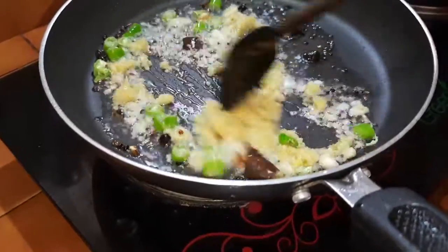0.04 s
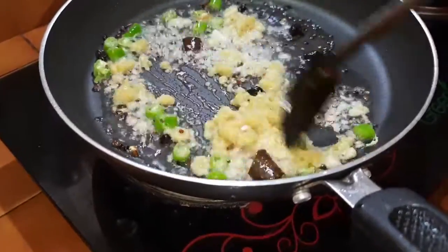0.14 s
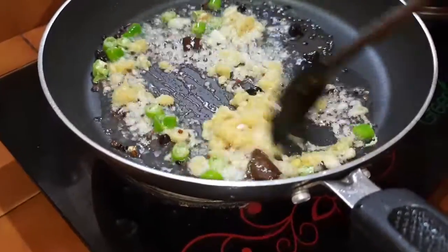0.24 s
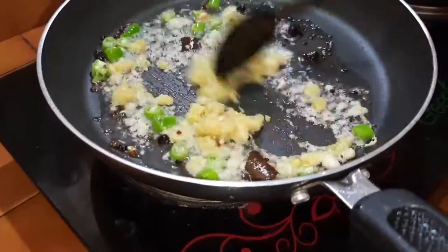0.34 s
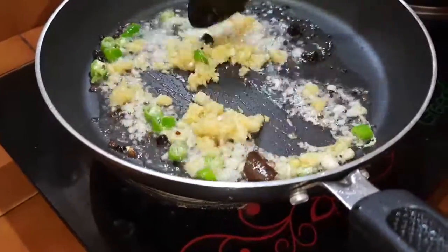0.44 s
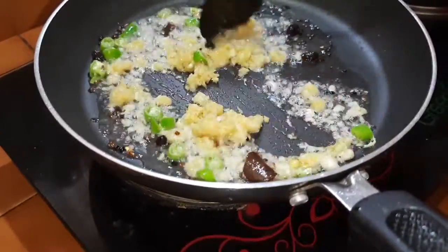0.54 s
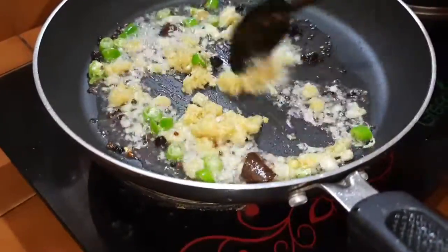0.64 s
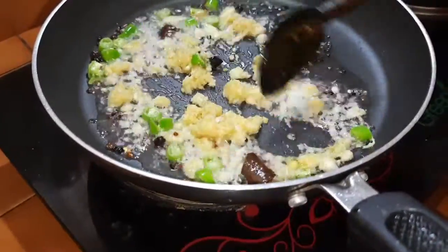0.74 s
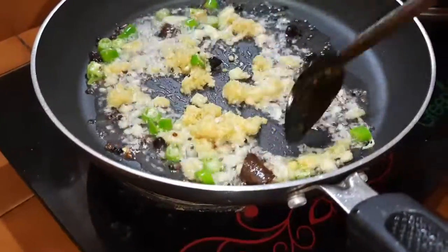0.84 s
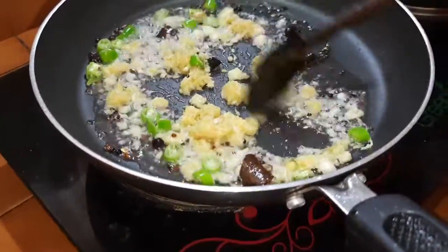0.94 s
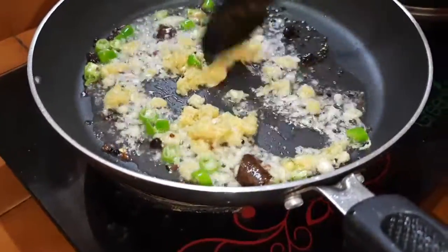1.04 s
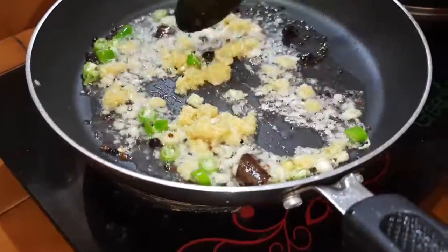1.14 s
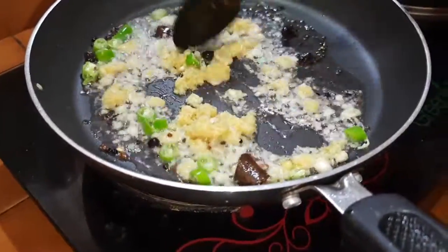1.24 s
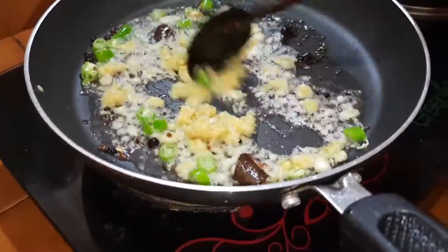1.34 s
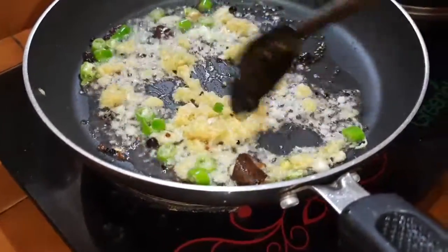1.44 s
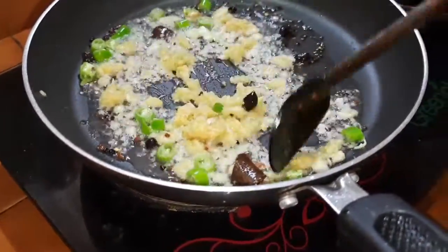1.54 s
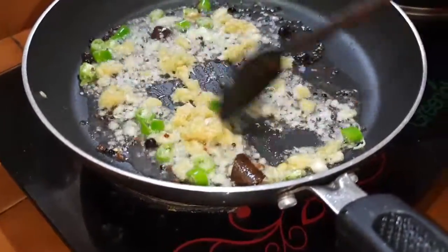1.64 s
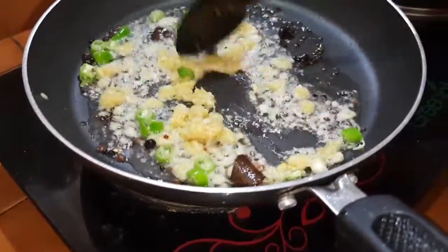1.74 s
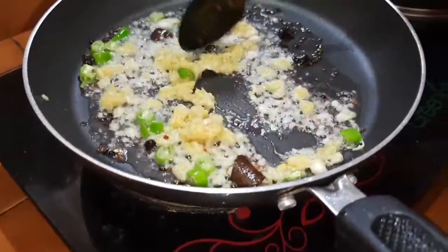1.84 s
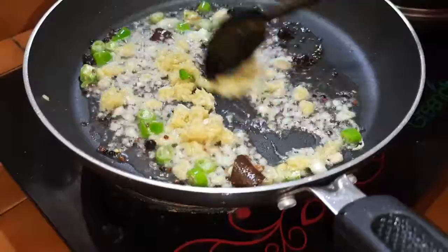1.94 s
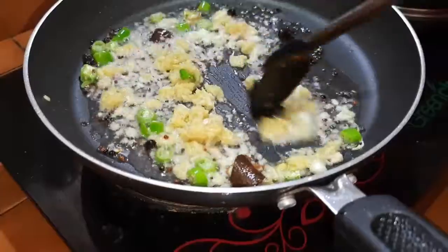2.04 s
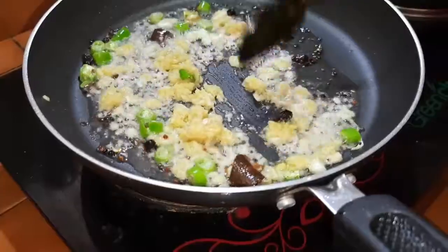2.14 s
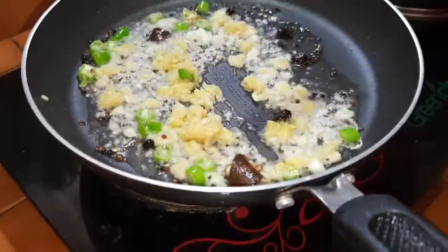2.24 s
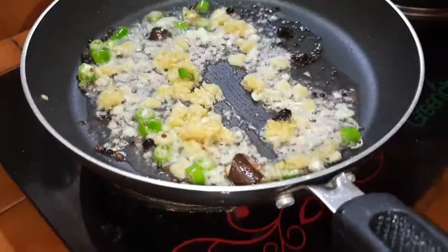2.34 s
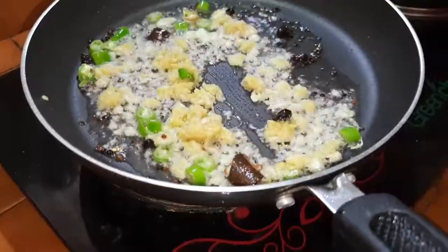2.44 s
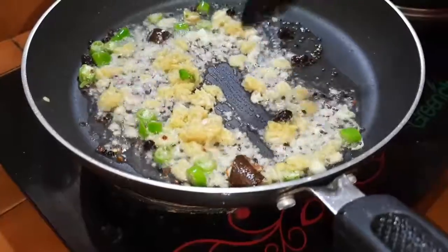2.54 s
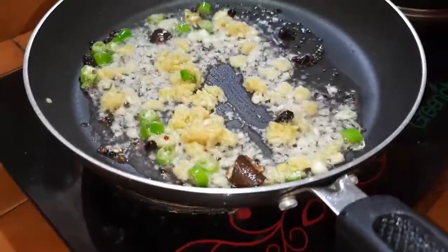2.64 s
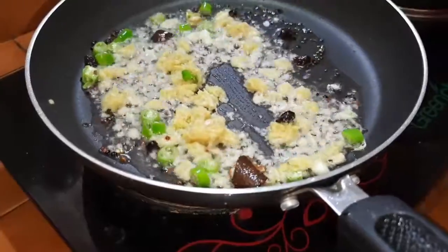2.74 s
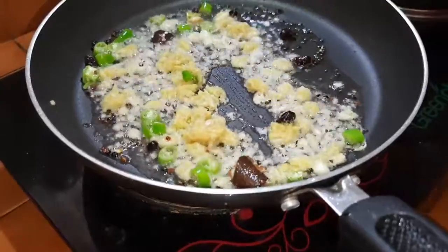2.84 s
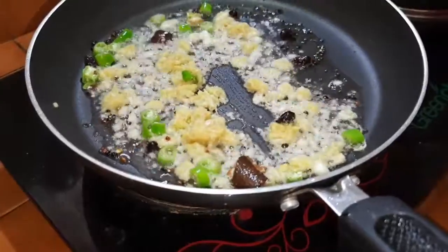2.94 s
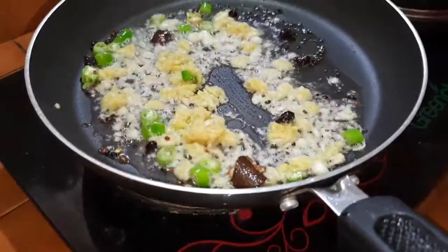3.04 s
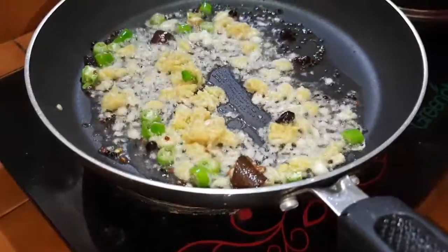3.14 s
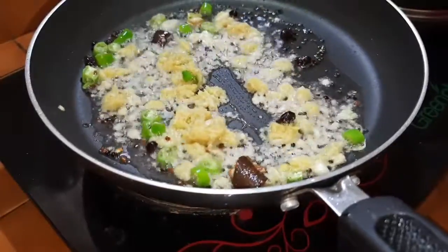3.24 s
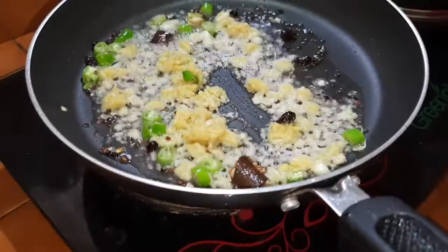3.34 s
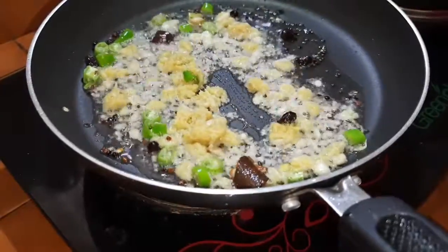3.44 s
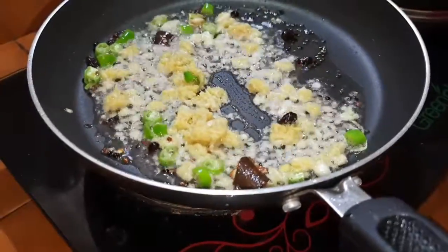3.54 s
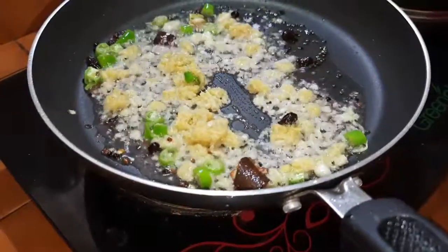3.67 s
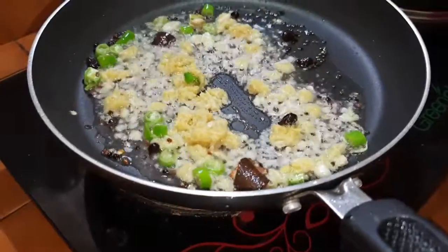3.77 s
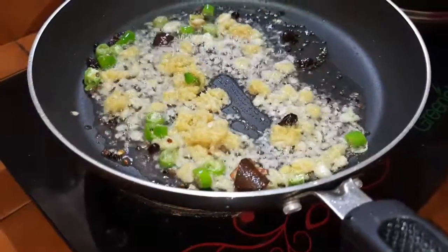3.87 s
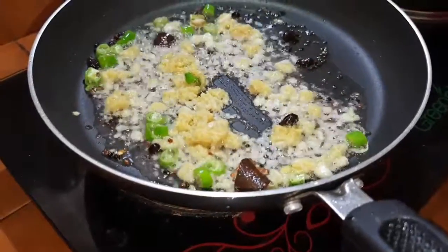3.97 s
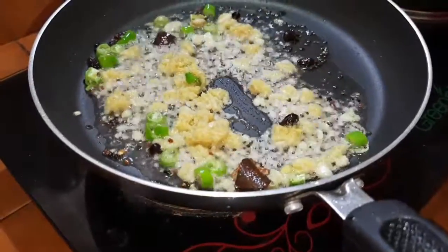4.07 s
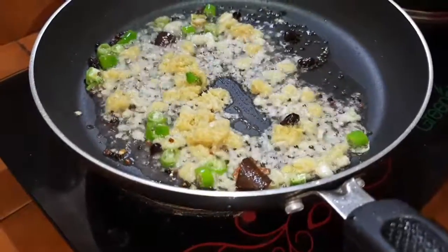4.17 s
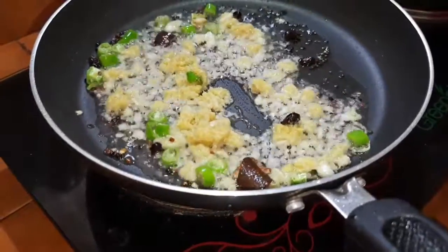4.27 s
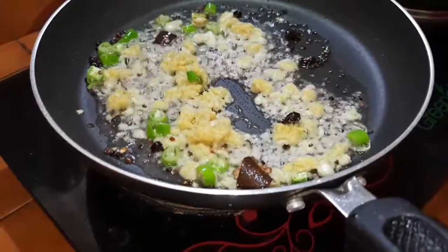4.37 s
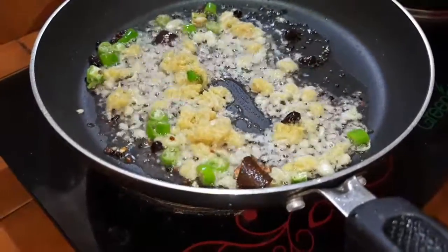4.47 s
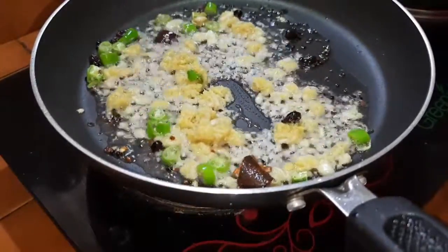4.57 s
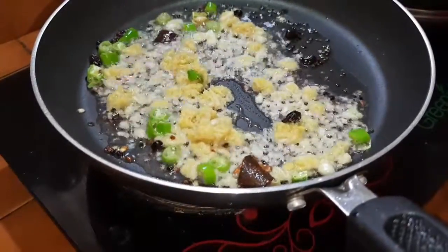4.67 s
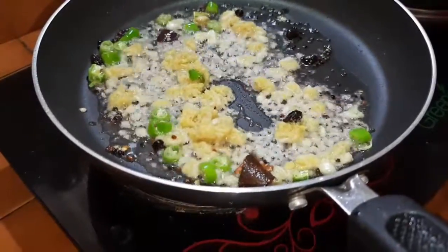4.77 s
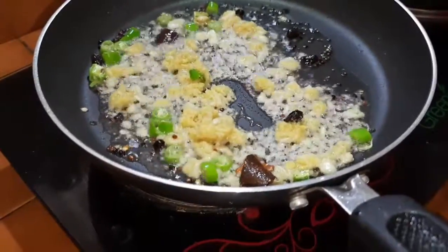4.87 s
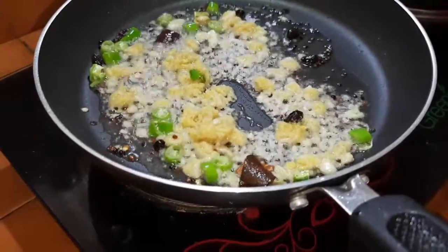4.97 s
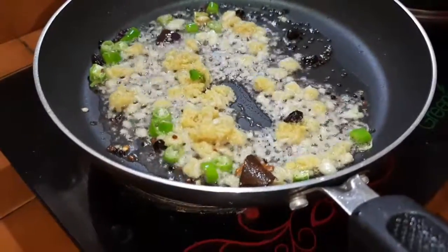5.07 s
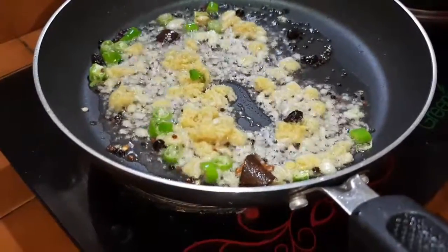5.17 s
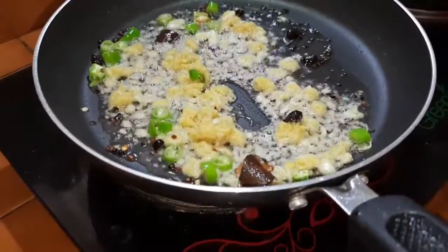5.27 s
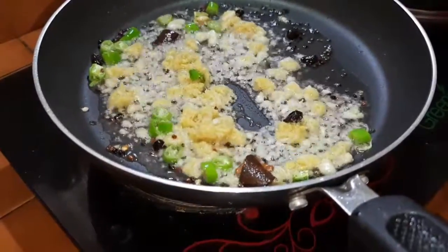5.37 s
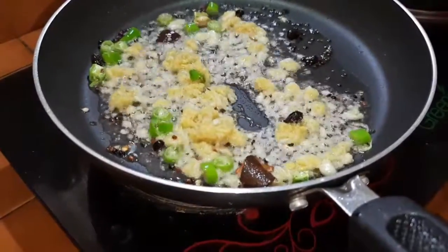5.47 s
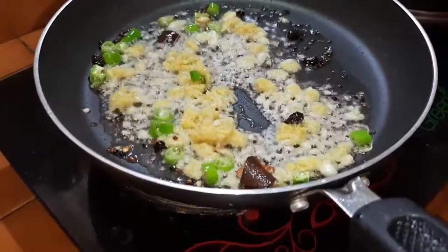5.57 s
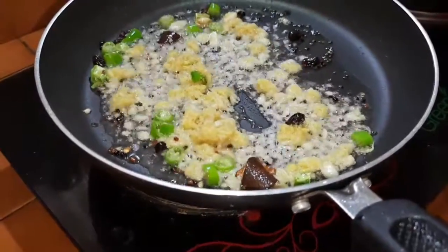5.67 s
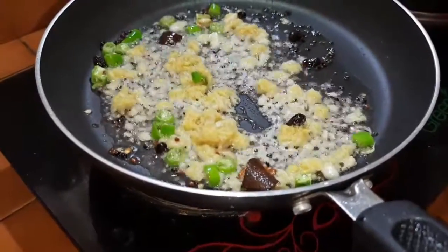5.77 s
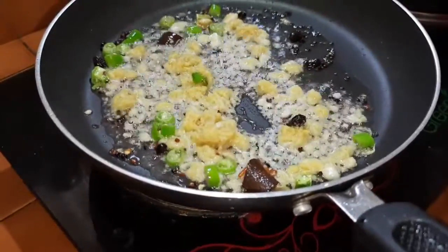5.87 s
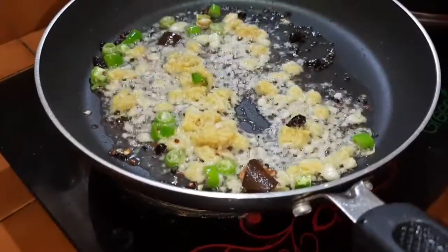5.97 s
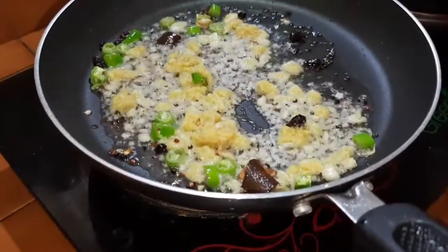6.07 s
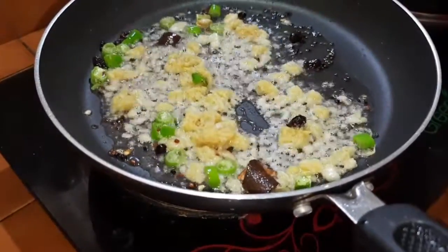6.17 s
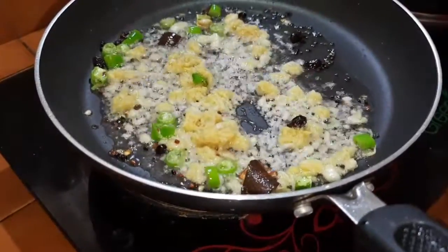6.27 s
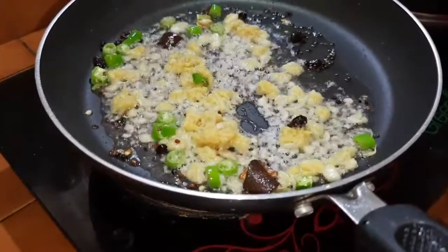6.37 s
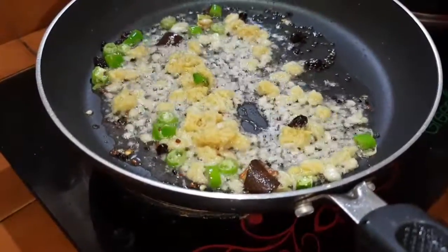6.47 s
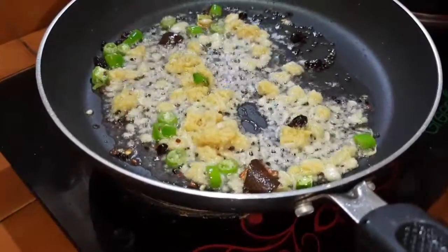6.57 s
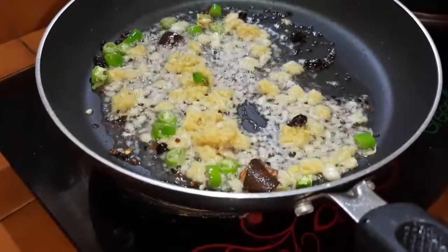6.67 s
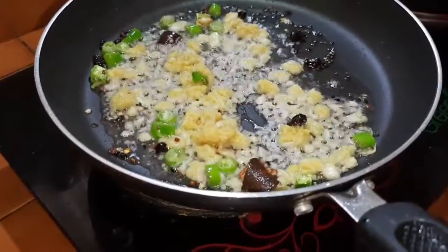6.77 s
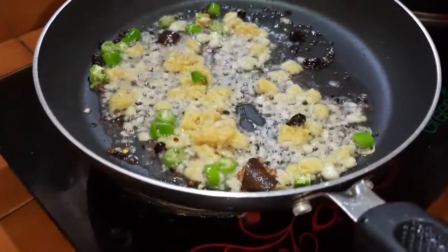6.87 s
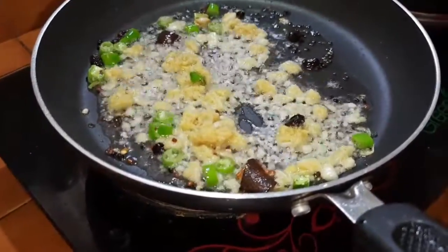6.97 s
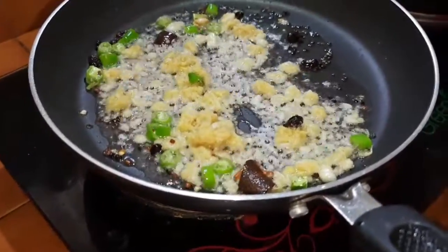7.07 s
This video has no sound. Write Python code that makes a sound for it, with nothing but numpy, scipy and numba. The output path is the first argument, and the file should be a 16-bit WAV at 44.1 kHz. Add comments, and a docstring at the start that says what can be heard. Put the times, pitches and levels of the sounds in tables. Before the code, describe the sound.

A close stereo phone pickup in a small kitchen: ginger, chillies and spices fry in hot oil, making a continuous dense, bright sizzle of countless tiny bursting bubbles, flickering unevenly. Sharp snaps and softer plops stand out, including a strong snap near 0.4 s and others around 1.0, 1.4 and 1.75 s. A spatula taps the pan with short, dry, muted metallic clacks and gritty scrapes at about 0.97-1.05, 1.36, 1.67 and 1.95-2.05 s. Only frying follows until 3.27 s, when the spatula is laid beside the pan: a quick cluster of knocks, rattling rubs and low hob thuds until 3.4 s, then a softer settling bump near 3.52 s and faint dull rubbing to about 3.8 s. The sizzle gradually calms, with sparser pops, including a bright snap at 4.5 s, continuing to the end around 7.1 s over a very faint rumble.

```python
"""In a kitchen, ginger, chillies and spices fry in hot oil close to a phone with two microphone ports.
Thousands of steam bubbles burst each second, as short swelling sines over filtered noise; a few pop loudly.
A spatula taps and scrapes the pan: filtered pushes and gritty noise excite its damped modes and rock it on the hob.
Later the spatula is laid down nearby with knocks, rubbing and thuds.
The frying calms slowly over a faint rumble of coloured noise."""
import sys
import numpy as np
from scipy import signal
from scipy.fft import rfft, irfft
from scipy.io import wavfile
from scipy.ndimage import uniform_filter1d
from numba import njit

SR = 44100
rng = np.random.default_rng(int(sys.argv[2]) if len(sys.argv) > 2 else 0)


def store_wav(level_fs):
    """Save 16-bit WAV to argv[1]."""
    pcm = np.round(np.clip(np.atleast_2d(level_fs), -1, 1) * 32767)
    wavfile.write(sys.argv[1], SR, pcm.T.astype(np.int16))


N = 313551  # length [samples]


def undb(db):
    """Decibel law: amplitude ratio of a level."""
    return 10 ** (np.asarray(db) / 20)


def unit(x):
    """Normalisation: scale to an rms of 1 over all channels."""
    return x / np.sqrt(np.mean(x ** 2))


def curves(table):
    """Linear interpolation: columns of a (time [s], ..) table, one value a sample."""
    s, *columns = np.transpose(table)
    return [np.interp(np.arange(N) / SR, s, c) for c in columns]


def butter(x, order, hz, kind="low"):
    """Butterworth filtering: a maximally flat pass band."""
    return signal.sosfilt(signal.butter(order, hz, kind, fs=SR, output="sos"), x)


def colour(x, table):
    """Linear filtering: multiply the spectra by (frequency [Hz], left [dB], right [dB]) curves."""
    hz, *sides = np.transpose(table)
    log_hz = np.log(np.arange(1, N // 2 + 2) * SR / N)
    gains = np.array([undb(np.interp(log_hz, np.log(hz), db)) for db in sides])
    return irfft(rfft(x) * gains, N)


def flatten(x):
    """Spectral whitening: even out the long-term spectrum."""
    spectrum = rfft(x)
    power = uniform_filter1d(np.abs(spectrum) ** 2, size=1500)
    return unit(irfft(spectrum / np.sqrt(power + 1e-9), N))


def walk(rate):
    """Slow random modulation: values held 1 / rate s, then smoothed twice; spread near 0.7."""
    k = int(SR / rate)
    held = np.repeat(rng.standard_normal(N // k + 1), k)
    return 0.96 * uniform_filter1d(uniform_filter1d(held, k), k)[:N]


def partly_shared_noise():
    """Spatial coherence: noise common to both ports, and noise of each port alone."""
    return rng.standard_normal(N), rng.standard_normal((2, N))


def ring(x, modes):
    """Modal superposition: a push sets every (frequency [Hz], level [dB], T60 [s]) mode ringing."""
    out = 0
    for hz, db, t60 in modes:
        pole = np.exp(2j * np.pi * hz / SR - np.log(1000) / (t60 * SR))
        out = out + undb(db) * signal.lfilter([1], [1, -pole], x).imag
    return out


@njit
def band(x, hz, share):
    """Resonance: a state-variable band-pass with a moving centre; width is a share of the centre."""
    y, b, l = np.empty(len(x)), 0., 0.
    for i in range(len(x)):
        g = np.tan(np.pi * hz[i] / SR)
        v = (b + g * (x[i] - l)) / (1 + g * (g + share))
        b, l, y[i] = 2 * v - b, l + 2 * g * v, share * v
    return y


def fixed_band(x, hz, share):
    """Resonance at a constant frequency."""
    return band(x, np.full(N, 1. * hz), share)


def impulse(s, db):
    """Ideal impact: all of the push falls in one sample."""
    return undb(db) * (np.arange(N) == int(s * SR))


def grit(rough_db):
    """Stick-slip friction: dense uneven slips of an edge dragged over a surface."""
    return unit(rng.standard_normal(N) * undb(rough_db * walk(250)))


def ports(x, left_lag_s):
    """Arrival time difference: one sound at both ports, late at the farther one."""
    k = int(round(left_lag_s * SR))
    return np.array([np.roll(x, max(k, 0)), np.roll(x, max(-k, 0))])


# treble resonances of the two microphone ports: (frequency [Hz], left [dB], right [dB])
PORT_RESONANCES = [(6800, 0, 1.34), (7890, -9.5, 3), (7710, 1.5, -17), (8700, 7, 3), (10260, 4, -1.5),
                   (11200, 2, -6.5), (12200, 6, 2.5), (13600, 1.5, -2.5), (14800, -0.5, 1),
                   (16900, -4, -5.5)]


def port_resonance(x):
    """Cavity resonance: each port colours the treble in its own way."""
    return colour(x, PORT_RESONANCES)


ROOM_T60_S, ROOM_ALIKE_HZ = 0.4, 350  # reverberation time; below this the tail is alike at both ports


def room(x, wet_db):
    """Diffuse reverberation: the walls return an exponentially decaying tail, coherent only in the bass."""
    t = np.arange(int(.4 * SR)) / SR
    shared, *own = rng.standard_normal((3, len(t)))
    tail = own + butter(shared - np.array(own), 1, ROOM_ALIKE_HZ)
    tail = tail * np.exp(-np.log(1000) * t / ROOM_T60_S) * (t > .003)
    tail /= np.sqrt(np.sum(tail ** 2, axis=1, keepdims=True))
    echoes = signal.fftconvolve(np.broadcast_to(x, (2, N)), tail, axes=1)[:, :N]
    return x + undb(wet_db) * echoes


# spectrum of the kitchen rumble: (frequency [Hz], left [dB], right [dB])
RUMBLE_SPECTRUM = [(25, -19, -34), (60, 1, -3), (93, -0.5, -18), (112, 3.5, -8), (137, -2, -9.5),
                   (222, -5, -11), (328, -1.5, -4), (614, -3.5, -10), (1100, -3, 2.5), (2500, -50, -46)]
KITCHEN_DB = -51


def kitchen():
    """Partially coherent background noise: a wavering low rumble, partly shared by both ports."""
    shared, own = partly_shared_noise()
    return undb(KITCHEN_DB + 0.25 * walk(5.3)) * unit(colour(0.6 * shared + own, RUMBLE_SPECTRUM))


# low modes of the hob top: (frequency [Hz], level [dB], T60 [s])
HOB_RESONANCES = [(61.5, -14, .12), (98, -23, 0.14), (145, -2, 0.1), (190, -9.5, 0.14), (240, 3.5, 0.058),
                  (332, -1, 0.063)]


def hob(x):
    """Plate radiation: the hob top booms at a few low modes and radiates little below them."""
    return butter(ring(x, HOB_RESONANCES), 2, 50, "high")


# modes of the spatula at rest: (frequency [Hz], level [dB], T60 [s])
SPATULA_RESONANCES = [(414, 0, 0.039), (660, 2, 0.019), (950, -7, 0.047), (1177, -3, 0.12),
                      (1282, 1, 0.096), (1540, 7, 0.023), (1900, -7, 0.03), (2150, -4, 0.079),
                      (2250, 2, 0.057), (2380, 2, .025), (2524, 10, 0.026), (2750, 7, .018)]


def spatula(x):
    """Modal vibration: the spatula rings where it is laid down."""
    return ring(x, SPATULA_RESONANCES)


def padded_contact(s, db, hz, passes):
    """Contact compliance: a padded blow pushes only the modes near its pitch."""
    push = impulse(s, db)
    for _ in range(passes):
        push = fixed_band(push, hz, 0.42)
    return push


# weight of the spatula thudding on the hob: (time [s], push strength [dB], pitch [Hz])
HOB_THUDS = [(3.274, -33, 240), (3.292, -36, 240), (3.312, -30, 235), (3.345, -31, 230), (3.365, -39, 139),
             (3.389, -42, 70), (3.455, -41, 205), (3.515, -40, 230), (3.535, -39.5, 145)]


def thuds():
    """Structure-borne sound: the weight of the spatula drives the hob top."""
    return hob(sum(padded_contact(s, db, hz, 1) for s, db, hz in HOB_THUDS))


# spatula landing and bouncing: (time [s], push strength [dB], pitch [Hz])
LANDING_KNOCKS = [(3.2957, -17, 900), (3.2995, -23, 950), (3.3117, -20, 1410), (3.315, -29, 2250),
                  (3.317, -28, 660), (3.334, -24, 2500), (3.338, -19, 1450), (3.352, -28, 2400),
                  (3.3573, -32, 2550), (3.362, -33, 2400), (3.377, -28, 1390), (3.52, -27, 1280),
                  (3.548, -29, 1200)]
REST_LAG_S = .00027  # blows beside the pan reach the left port last


def knocks():
    """Impact excitation: each bounce gives its own push and sets the spatula ringing."""
    push = sum(padded_contact(s, db, hz, 2) for s, db, hz in LANDING_KNOCKS)
    return ports(spatula(push) + 6.5 * push, REST_LAG_S)


# spatula sliding to rest: (time [s], rubbing strength [dB], brightness [Hz])
SLIDE = [(3.262, -66, 700), (3.276, -58, 700), (3.3, -33, 900), (3.308, -30, 1200), (3.316, -30, 1800),
         (3.329, -28, 2000), (3.338, -27, 2300), (3.355, -26.5, 2290), (3.376, -31, 1900),
         (3.396, -35, 1700), (3.438, -53, 1500), (3.468, -42, 1300), (3.505, -46, 1250),
         (3.526, -41.5, 1250), (3.56, -41.5, 1200), (3.6, -52, 1200), (3.66, -59, 1100), (3.69, -47, 420),
         (3.72, -47.5, 404), (3.82, -51, 403)]


def sliding():
    """Friction excitation: slips rattle the spatula; harder rubbing adds a bright rasp."""
    rub_db, bright_hz = curves(SLIDE)
    # the whole length rattles: each port hears its own slips
    rub = np.array([band(band(grit(2.8), bright_hz, 1.0), bright_hz, 2.5) for _ in range(2)])
    body = unit(spatula(rub)) + 0.5 * unit(rub)
    rasp = unit(np.array([fixed_band(grit(3.5), 5000, 0.75) for _ in range(2)]))
    rasp = rasp * undb(4.0 + 0.4 * (rub_db - rub_db.max()))
    t = np.arange(N) / SR
    moving = (t > SLIDE[0][0]) & (t < SLIDE[-1][0])
    return moving * undb(rub_db) * (body + rasp)


# spatula on the pan, and at 1.169 s a low puff of air from a pop:
# (time [s], push strength [dB], dullest [Hz], brightest [Hz],
#   drag length [s], drag strength [dB], rocking strength [dB], rocking pitch [Hz])
PAN_PUSHES = [(0.9715, -15, 760, 1900, 0.012, -49, -72, 240),
              (.9865, -23, 900, 1700, 0.027, -46.5, -54.5, 240),
              (1.0311, -14.5, 1010, 6500, 0.0025, -40, -61, 190),
              (1.045, -34, 1800, 2800, 0.014, -43, -57, 80), (1.169, -32.5, 70, 2000, .003, -61, -68, 70),
              (1.3605, -18, 563, 1900, 0.0067, -53, -71, 145),
              (1.373, -32, 500, 1100, 0.0083, -67, -80, 145), (1.395, -27, 503, 900, 0.041, -57, -82, 145),
              (1.6695, -21.5, 1000, 3200, 0.024, -45, -59, 143),
              (1.686, -26, 1300, 3200, .018, -51, -75, 143), (1.695, -26, 596, 1500, 0.0065, -52, -78, 143),
              (1.704, -29, 700, 1500, 0.0066, -49, -80, 143), (1.951, -13, 590, 1150, .012, -48, -58, 145),
              (1.965, -27, 480, 900, 0.01, -65, -74, 144), (1.987, -24, 520, 970, 0.026, -52, -81, 145),
              (2.045, -35, 540, 745, 0.033, -61, -87, 145)]
# modes of the pan: (frequency [Hz], level [dB], T60 [s])
PAN_RESONANCES = [(520, -9, 0.02), (638, -5.5, 0.052), (700, -12, 0.035), (776, -8, 0.029),
                  (860, -7.5, 0.017), (1014, -5.5, 0.041), (1200, -5, 0.012), (1460, -5, 0.023),
                  (1880, -9, 0.013), (2040, -6, 0.029), (2340, -8, 0.021), (2610, -3, 0.03),
                  (2970, -7, 0.039), (3900, 0.5, 0.012), (4700, 6, .011), (5400, 8, .011)]
TAP_LEAD_S = .00008  # pushes on the pan reach the left port first


def taps_and_puff():
    """Impact and friction: a push and gritty noise ring the pan, and low hob modes answer late."""
    t, push, rock, slips = np.arange(N) / SR, np.zeros(N), np.zeros(N), grit(3.0)
    for s, push_db, dull_hz, bright_hz, drag_s, drag_db, rock_db, rock_hz in PAN_PUSHES:
        since = np.maximum(t - s, 0)
        drag = (since > 0) * undb(drag_db) * slips * np.exp(-(since / drag_s) ** 3)
        # for a tap, the place of the blow sets its colour
        push += butter(impulse(s, push_db) + drag, 2, [dull_hz, bright_hz], "band")
        # the rocking of the pan builds up late
        rocking = undb(rock_db) * slips * since / 0.015 * np.exp(-since / 0.016)
        rock += fixed_band(rocking, rock_hz, 0.56)
    pan = butter(ring(push, PAN_RESONANCES), 2, 400, "high") + 8.1 * push
    return ports(pan, -TAP_LEAD_S) + hob(rock)


@njit
def bursts(start, hz, cycles, size, n):
    """Damped bubble oscillation: each swells for a third of its cycles, rings and dies."""
    out = np.zeros(n)
    for k in range(len(hz)):
        fade = 3 * hz[k] / SR / cycles[k]
        p = np.exp(2j * np.pi * hz[k] / SR - fade)
        z = size[k] * np.e * fade + 0j
        for i in range(min(n - start[k], int(8 / fade) + 2)):
            out[start[k] + i] += i * z.imag
            z *= p
    return out


def both_ports(s, lag_s, hz, cycles, size, pan_db):
    """Time and level differences: a burst reaches the ports at its own lag and balance."""
    channels = []
    for side in (1, -1):  # left, right
        start = np.clip(((s + side * lag_s / 2) * SR).astype(np.int64), 0, N - 1)
        channels.append(bursts(start, hz, cycles, size * undb(side * pan_db / 2), N))
    return np.array(channels)


# large bubbles plop long, small ones snap short and farther to the left:
# (pitch [Hz], length [cycles], left minus right [dB], full spread of the lag between ports [s])
BUBBLE_LAW = [(5600, 10, 2, 0.00029), (8400, 3, 4, .0003)]
SNAP_DB, SNAP_PITCH, SNAP_CYCLES = -12, 0.49, 1.27  # dull opening snap: relative level, share of pitch, length


def pops(s, level_db, hz):
    """Bubble scaling: pitch sets the length and side of a burst; a dull snap opens it."""
    law_hz, *laws = np.transpose(BUBBLE_LAW)
    cycles, pan_db, spread_s = [np.interp(hz, law_hz, law) for law in laws]
    lag_s = spread_s * (rng.random(len(s)) - .5)
    ringing = both_ports(s + 0.00044, lag_s, hz, cycles, undb(level_db), pan_db)
    snap_cycles = np.full(len(s), SNAP_CYCLES)
    snap = both_ports(s + 0.0004, lag_s, SNAP_PITCH * hz, snap_cycles, undb(level_db + SNAP_DB), pan_db)
    return port_resonance(ringing + snap)


# single bubbles bursting at set times, loud snaps and softer plops:
# (time [s], level before the port resonances [dB], pitch [Hz])
SINGLE_POPS = [(0.017, -9, 8720), (0.115, -6, 8650), (0.2905, -9, 9710), (0.313, -12, 9150),
               (0.432, 3, 12200), (0.4798, -17, 6500), (0.5604, -10, 12500), (0.5732, -10, 9300),
               (0.6494, -9, 9000), (0.6629, -13, 9710), (1.0307, -2, 9400), (1.136, -11, 9000),
               (1.1445, -17, 4000), (1.166, -24, 4100), (1.1675, -6, 12200), (1.224, -10, 9070),
               (1.242, -12, 5600), (1.3172, -7, 8500), (1.3828, -1, 12700), (1.619, -19.5, 3840),
               (1.7436, -13, 5600), (1.7436, -8, 12200), (1.744, 0, 9400), (1.806, -8, 8600),
               (1.806, -18, 6200), (1.964, -7, 9610), (2.0862, -9, 12600), (2.1424, -17, 5240),
               (2.1927, -12, 8510), (2.6585, -6, 12200), (2.7792, -18.5, 4050), (3.189, -10, 3900),
               (3.3119, -10, 8420), (3.42, -14, 3780), (3.4207, -17, 4700), (3.613, -13, 3900),
               (3.6133, -21, 4700), (3.69, -17, 5400), (3.9659, -19, 5270), (4.046, -12, 8610),
               (4.514, -3.5, 11900), (4.6872, -12, 12100), (4.7561, -26, 4970), (5.9184, -26, 4680),
               (6.4285, -9, 8750), (6.6506, -17, 4640), (6.971, -23, 4330), (7.0227, -9, 12200)]


def single_pops():
    """Transient radiation: single bubbles burst at set times, loud snaps and softer plops."""
    return pops(*np.transpose(SINGLE_POPS))


# strength of the frying: (time [s], level [dB])
FRYING_LEVEL = [(0.0, -17), (0.3, -17.5), (0.5, -17), (0.75, -16.5), (0.88, -18), (1.08, -16),
                (1.22, -17.5), (1.6, -18.5), (1.95, -18), (2.12, -19.5), (2.75, -19.5), (3.25, -20.5),
                (3.41, -20), (3.74, -21), (4.3, -22), (4.8, -22.5), (5.6, -23), (7.11, -24)]
SNAPS_ABOVE_DB, SNAPS_SCATTER_DB = 6, 2.5  # level above the frying, most scatter either way


def random_snaps(count=60):
    """Random point process: more snaps at random times, denser early on, whose level follows the frying."""
    when, pitch, big = rng.random((count, 3)).T
    s = when ** 1.8 * N / SR
    level_db = np.interp(s, *np.transpose(FRYING_LEVEL)) + SNAPS_ABOVE_DB
    level_db = level_db + SNAPS_SCATTER_DB * (2 * big - 1)
    return pops(s, level_db, 8300 + 4600 * pitch)


# colour from the bubble sizes and the bowl of the pan: (frequency [Hz], left [dB], right [dB])
OIL_SPECTRUM = [(256, -30, -29.5), (545, -16, -16.5), (1060, -10.5, -10), (1150, -11, -16),
                (1366, -3.5, -4), (1680, -11.5, -10.5), (1950, -5, -5.5), (3130, -3.5, -5), (3850, -7, -4),
                (3630, -1, -3.5), (4750, 0.1, 0.1), (6400, 0.4, 1.33)]
FRY_LEAN_DB, FRY_WANDER_DB = 1.05, 0.63  # lean to the left; factor on its random walk


def frying(count=60000):
    """Superposed random bursts: steam bubbles all over the pan, with noise for the smallest and echoes."""
    level_db, pan_db = curves(FRYING_LEVEL)[0], FRY_LEAN_DB + FRY_WANDER_DB * walk(15.0)
    s, pitch, place, big, lean, long = rng.random((count, 6)).T
    hz = 200 + 16000 * pitch ** 1.3
    size = np.sqrt(hz) * undb(-2.2 * np.log(1.003 - big))  # large bursts are rare
    lag_s = .0009 * (place - .5)
    crackle = both_ports(s * N / SR, lag_s, hz, 1.94 + 5 * long, size, 9 * (lean - .5))
    shared, own = partly_shared_noise()
    hiss = own + 0.84 * butter(shared - own, 2, 1300)  # long waves are more alike at both ports
    oil = port_resonance(colour(flatten(crackle) + undb(4.0) * hiss, OIL_SPECTRUM))
    # patches of the pan flare and calm: large and small bubbles flicker apart
    low = butter(oil, 2, 3000)
    oil = low * undb(2.0 * walk(16)) + (oil - low) * undb(0.61 * walk(22.27))
    return unit(oil) * undb(level_db + 0.67 * walk(40) + np.array([pan_db, -pan_db]) / 2)


def scene():
    """Linear superposition: background, spatula, pops and frying add up."""
    # the rim of the pan shields the walls from the bursts inside it
    oil = frying() + room(single_pops() + random_snaps(), wet_db=-7)
    contacts = taps_and_puff() + knocks() + sliding() + thuds()
    return oil + room(contacts, wet_db=-2.5) + kitchen()


TOP_HZ = 15620


def record(dry):
    """Saturation and band limit: the phone clips the highest peaks and cuts the top steeply."""
    steep = signal.ellip(14, .2, 95, TOP_HZ, fs=SR, output="sos")
    return signal.sosfilt(steep, np.clip(dry, -.97, .97))


dry = scene()
out = record(dry)
store_wav(out)
```